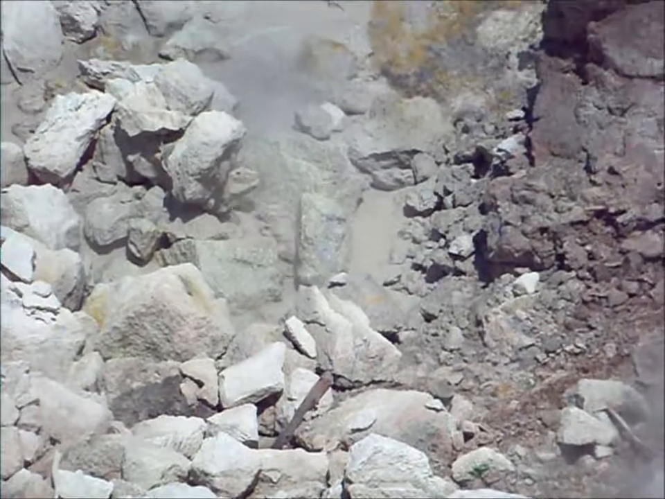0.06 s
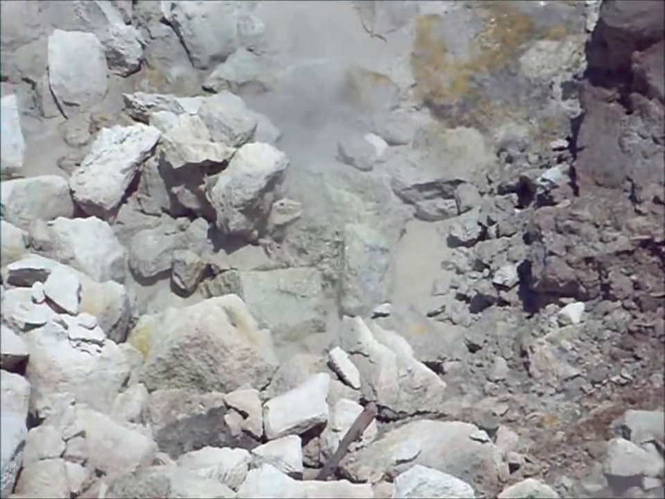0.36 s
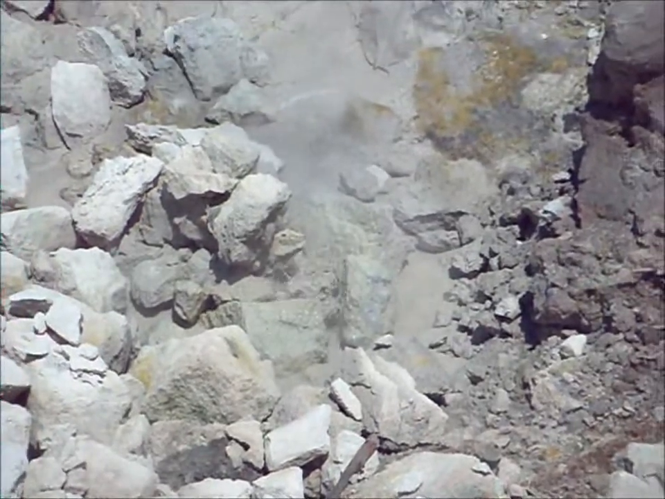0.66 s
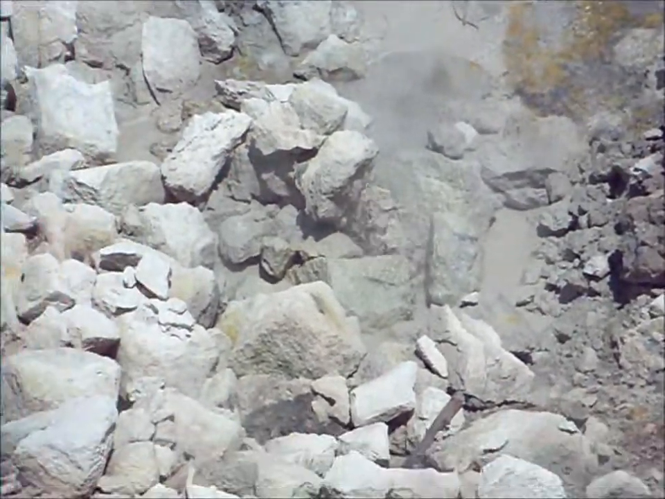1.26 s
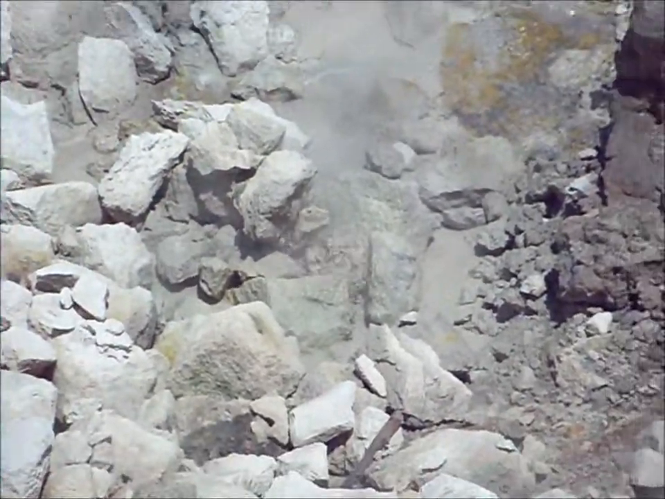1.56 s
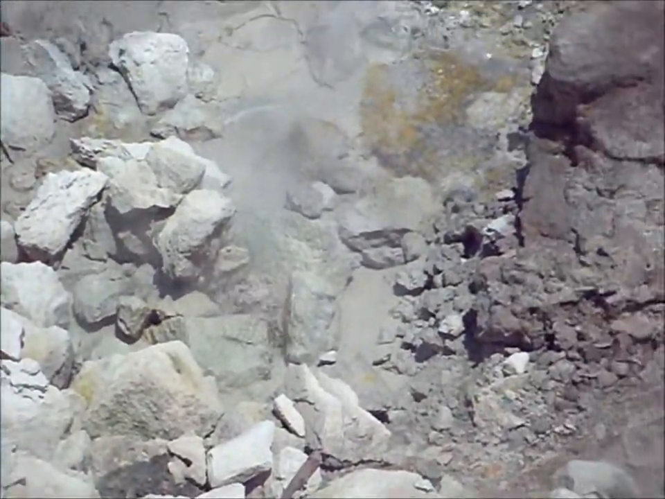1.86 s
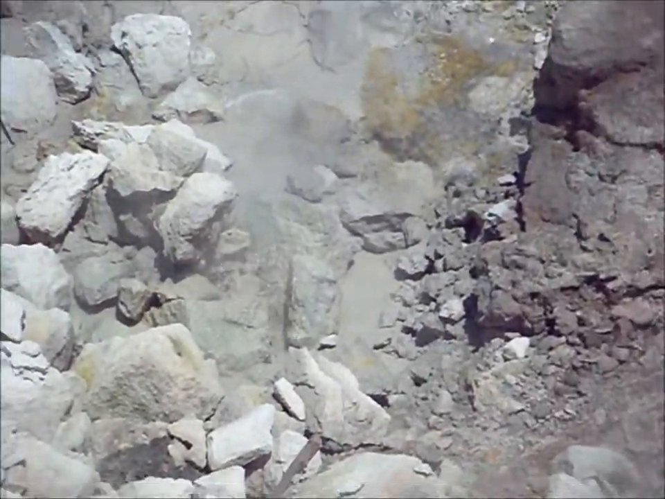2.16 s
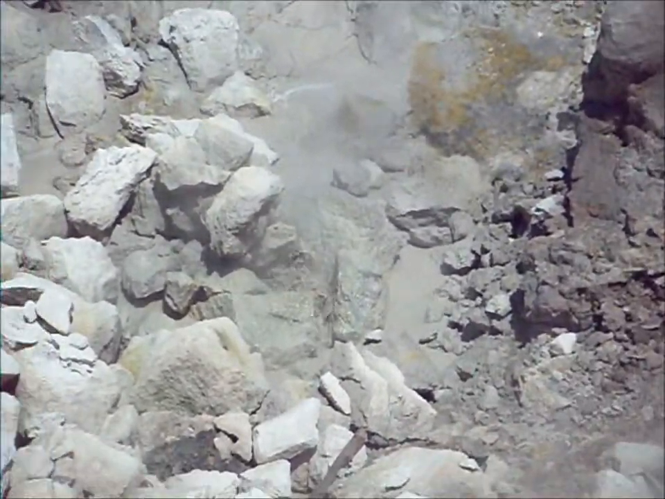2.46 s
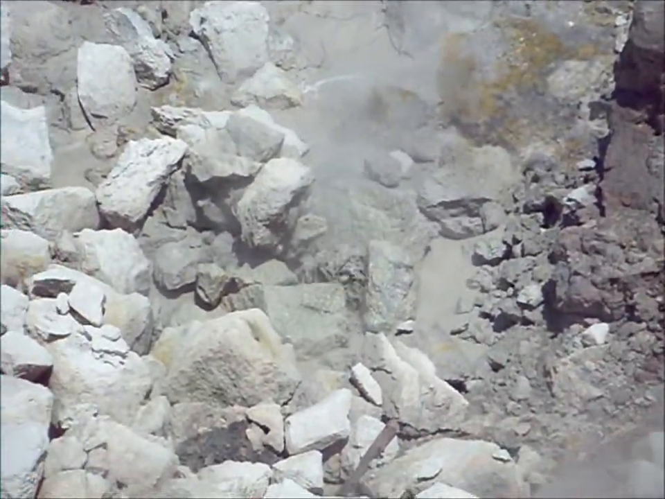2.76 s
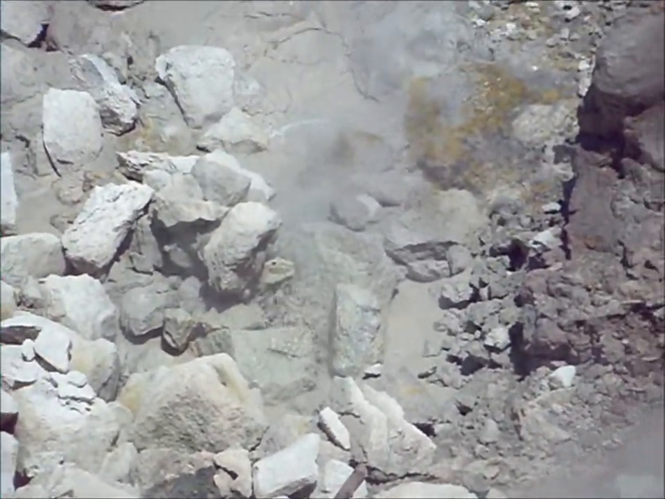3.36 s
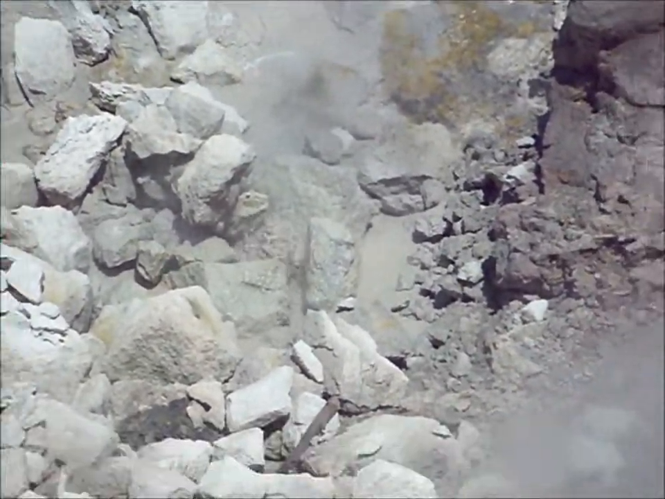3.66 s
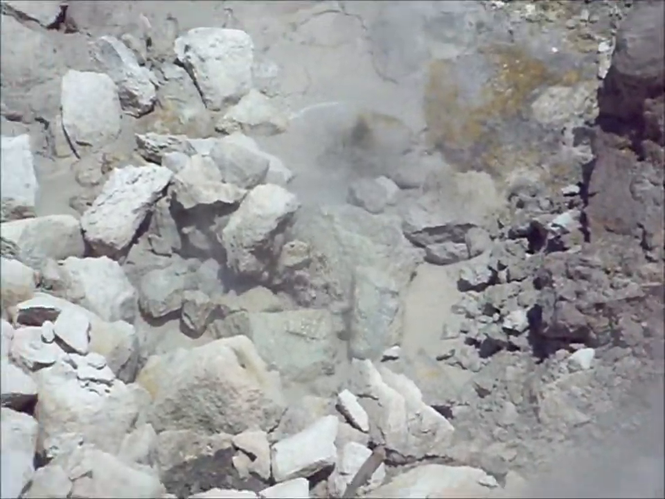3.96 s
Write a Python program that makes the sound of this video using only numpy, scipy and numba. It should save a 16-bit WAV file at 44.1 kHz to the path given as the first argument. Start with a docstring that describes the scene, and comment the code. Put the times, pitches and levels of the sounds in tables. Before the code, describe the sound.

A steam vent hisses outdoors above the low rush of boiling water. Early on, wind rumble and sharp handling knocks on the microphone make the hiss dip and swell back. The vent spits briefly, then another knock and soft thumps follow.

```python
"""From the start, steam hisses steadily from a vent among rocks, over the duller rush of boiling water.
From about one second in, the hand-held camera is bumped and knocked over a low rumble of wind and
fingers. Each knock overloads the microphone; the gain control turns the hiss down and lets it swell back.
The vent spits briefly, once among the knocks and twice in the calmer stretch that follows.
In the last half second comes one more knock, with a few more bumps."""
import sys
import numpy as np
from scipy import signal
from scipy.io import wavfile
from scipy.ndimage import minimum_filter1d
from numba import njit

SR = 44100
rng = np.random.default_rng(int(sys.argv[2]) if len(sys.argv) > 2 else 0)


def to_wav(sig):
    """Store sig (one row per channel, or 1-D mono) as 16-bit WAV at the path in sys.argv[1].

    Samples outside -1..1 are clipped; the rate is SR.
    """
    pcm = np.clip(np.atleast_2d(sig), -1, 1) * 32767
    pcm = np.round(pcm).astype(np.int16)
    wavfile.write(sys.argv[1], SR, pcm.T)  # frames by channels


N = 176400

# tone of the steam jet: (frequency [Hz], level [dB per Hz])
JET_SPECTRUM = [(700, -24), (950, -13), (1150, -2), (1300, -5), (1790, 1.5), (2080, 1), (2400, -3),
                (2850, -7.5), (3200, -5.5), (3600, -13.5), (4050, -13), (4500, -15.5), (5200, -21.5),
                (6000, -30)]
# loudness of the jet: (time [s], level [dB])
JET_LEVEL = [(0, -23.5), (.5, -22.5), (.9, -24.5), (1.2, -23), (1.65, -25), (1.9, -27), (2.35, -22),
             (2.6, -26), (3.1, -22.5), (3.5, -25), (3.6, -24), (3.8, -25.5), (4, -24.5)]
# faint whistles of the vent's cracks: (pitch [Hz], width [Hz], level against the jet [dB])
WHISTLES = [(1843, 80, -23), (3220, 51, -25.5), (3934, 20, -27)]
# tone of the boiling water: (frequency [Hz], level [dB per Hz])
BOIL_SPECTRUM = [(40, -3.5), (70, -3), (110, -0.5), (165, 1.5), (230, -0.5), (350, 0.5), (520, -3),
                 (750, -4), (1000, -3), (1400, -20)]
# loudness of the boiling: (time [s], level [dB])
BOIL_LEVEL = [(0, -30.5), (.8, -30), (1.5, -30), (2.3, -32.5), (3, -33), (3.5, -34), (3.7, -32), (4, -38.5)]
# tone of wind and fingers on the microphone: (frequency [Hz], level [dB per Hz])
RUMBLE_SPECTRUM = [(10, -4), (20, 1.5), (35, -9.5), (70, -10.5), (160, -31)]
# loudness of that rumble: (time [s], level [dB])
RUMBLE_LEVEL = [(0, -36.5), (.8, -42.5), (.9, -28), (1.0, -26), (1.15, -21), (1.36, -24), (1.6, -32.5),
                (2.2, -33), (3.45, -38), (3.65, -21), (3.82, -28.5), (4, -30)]
# soft bumps of the hand: (time of peak [s], level [dB], rise time [s], rebound frequency [Hz])
BUMPS = [(.897, -12, 0.0045, 35), (.927, -9, .007, 77), (0.933, -9, 0.0014, 90), (0.952, 2, 0.0013, 105),
         (1.1135, 1, 0.0015, 19), (1.130, -7.5, 0.00046, 69), (1.240, -6.5, .003, 37),
         (1.253, 2, 0.0018, 93), (3.539, 2, 0.0027, 91), (3.609, -1, 0.0017, 19.5),
         (3.801, -13.5, .008, 16), (3.85, 9.5, .002, 94)]
# hard knocks on the camera: (time [s], level [dB], pitch of the case [Hz], contact time [s])
KNOCKS = [(0.9362, 9, 987, 0.0009), (0.9403, 21.5, 994, .0016), (1.4193, 24.5, 823, 0.00044),
          (1.7212, 30, 807, .0002), (3.5322, 10, 920, 0.00091)]
# ringing tones of the camera case: (multiple of its pitch, level [dB], time to fade by 60 dB [s])
CASE_TONES = [(.33, -15, 0.016), (.8, -4, 0.018), (1.03, -3.5, 0.019), (1.3, -7.5, 0.0096),
              (1.62, -8, 0.018), (3.35, -3.5, .009), (4.9, -9, 0.0051)]
# spits from the vent: (time [s], level [dB])
SPITS = [(1.294, -16.5), (2.653, -13), (3.311, -25)]

SURGE_DB, SURGES_PER_S, FLICKERS_PER_S = 1.15, 8.6, 35
BUMP_DECAY_CYCLES, SCUFF_DB, SCUFF_HZ = 0.38, -25, 700
SPIT_BAND_HZ, SPIT_FADE_S = (2320, 3740), 0.02
THRESHOLD_DB, SQUEEZE, DEEPEST_DB = -4, 0.9, -24.5
LOOKAHEAD_S, ATTACK_S, HOLD_S = 0.007, 0.0045, 0.12
QUICK_SHARE, QUICK_RELEASE_S, SLOW_RELEASE_S = 0.25, 0.026, 0.14
AMPLIFIER_HISS_DB, OVERLOAD_DB, CUTOFF_HZ, TOP_HZ = -47.5, 0.5, 5350, 17500


def from_db(db):
    """Turn decibels into a number to multiply a sound by."""
    return 10 ** (np.asarray(db) / 20)


def rms_one(x):
    """Scale a signal so that its average strength (rms) is 1."""
    return x / np.sqrt(np.mean(x ** 2) + 1e-20)


def in_time(rows):
    """Join (time, value) points with straight lines, giving a value for every sample."""
    return np.interp(np.arange(N) / SR, *np.transpose(rows))


def drift(rate):
    """A smooth random wobble of about 1 either way; a higher rate makes it faster."""
    step = 40  # samples between points
    pole = np.exp(-2 * np.pi * step * rate / SR)
    noise = rng.standard_normal(N // step + 2002)
    slow = signal.lfilter([1], [1, -2 * pole, pole * pole], noise)[2000:]  # skip the filter's warm-up
    return np.interp(np.arange(N) / step, np.arange(len(slow)), rms_one(slow))


def filtered_noise(hz, kind, length):
    """Noise kept inside a "band" of frequencies, or "low", below one frequency."""
    return signal.sosfilt(signal.butter(2, hz, kind, fs=SR, output="sos"), rng.standard_normal(length))


def turbulence(spectrum, flicker_db, bands):
    """The noise of swirling air or water: bands that can each flicker on their own."""
    hz, db = np.transpose(spectrum)
    edges = np.geomspace(hz.min(), hz.max(), bands + 1)
    out = np.zeros(N)
    for low, high in zip(edges, edges[1:]):
        band = filtered_noise([low, high], "band", N + SR)[SR:]
        band_db = np.interp(np.log(low * high) / 2, np.log(hz), db)
        out += band * from_db(band_db + flicker_db * drift(FLICKERS_PER_S))
    return rms_one(out)


def add(track, time_s, sound):
    """Mix a sound into the track at the given time."""
    start = int(time_s * SR)
    track[start:start + len(sound)] += sound[:N - start]


def whistle(hz, width_hz):
    """Steam rushing through a crack makes it ring around one pitch."""
    b, a = signal.iirpeak(hz, hz / width_hz, fs=SR)
    ringing = signal.lfilter(b, a, rng.standard_normal(N))
    return rms_one(signal.lfilter(b, a, ringing))  # a second pass sharpens the pitch


def vent():
    """The steam jet, its whistles and the boiling water below swell and sink together."""
    surge_db = SURGE_DB * drift(SURGES_PER_S)
    jet = turbulence(JET_SPECTRUM, flicker_db=1.5, bands=22)
    jet += sum(from_db(db) * whistle(hz, width_hz) for hz, width_hz, db in WHISTLES)
    boil = turbulence(BOIL_SPECTRUM, flicker_db=0, bands=14)
    return from_db(in_time(JET_LEVEL) + surge_db) * jet + from_db(in_time(BOIL_LEVEL) + surge_db) * boil


def rumble():
    """Wind and fingers on the microphone make a lumpy, low noise."""
    return from_db(in_time(RUMBLE_LEVEL)) * turbulence(RUMBLE_SPECTRUM, flicker_db=3, bands=6)


def bumps():
    """Each bump of the hand is a smooth push and a rebound that dies fast, with a faint scuff of skin."""
    out = np.zeros(N)
    t = np.arange(-SR // 20, SR // 5) / SR  # the peak is at t = 0
    for peak_s, db, rise_s, hz in BUMPS:
        cycles = np.maximum(t, 0) * hz
        rise = np.exp(-(np.minimum(t, 0) / rise_s) ** 2)
        fade = 1 / np.cosh(cycles / BUMP_DECAY_CYCLES) ** 2
        rebound = np.cos(2 * np.pi * cycles)
        scuff = from_db(SCUFF_DB) * rms_one(filtered_noise(SCUFF_HZ, "low", len(t)))
        add(out, peak_s + t[0], from_db(db) * rise * fade * (rebound + scuff))
    return out


def knocks():
    """Each knock briefly rings the camera case; a longer contact starts softer and sounds duller."""
    out = np.zeros(N)
    t = np.arange(SR // 10) / SR
    for time_s, db, hz, contact_s in KNOCKS:
        rise = 1 - np.exp(-t / contact_s)
        for multiple, tone_db, fade_s in CASE_TONES:
            dulling = (1 + (contact_s * hz) ** 2) / (1 + (contact_s * hz * multiple) ** 2)
            fade = from_db(db + tone_db - 60 * t / fade_s)
            tone = np.sin(2 * np.pi * (hz * multiple * t + rng.random()))
            add(out, time_s, dulling * rise * fade * tone)
    return out


@njit
def follow(wanted, release_s):
    """Move towards the wanted gain: fast going down, slower coming back up."""
    attack, release = 1 / (ATTACK_S * SR), 1 / (release_s * SR)
    out, gain = np.empty_like(wanted), 1.0
    for i in range(len(wanted)):
        gain += (wanted[i] - gain) * (attack if wanted[i] < gain else release)
        out[i] = gain
    return out


def gain_control(x):
    """Turn the volume down just before a loud peak, wait, then bring some back fast, the rest slowly."""
    coming = np.interp(np.arange(N) + LOOKAHEAD_S * SR, np.arange(N), np.abs(x))
    excess = np.maximum(coming / from_db(THRESHOLD_DB), 1)
    wanted = np.maximum(excess ** -SQUEEZE, from_db(DEEPEST_DB))
    half_hold = int(HOLD_S * SR / 2)
    held = minimum_filter1d(wanted, 2 * half_hold + 1, origin=half_hold, mode="nearest")
    quick = follow(held, QUICK_RELEASE_S)
    slow = follow(held, SLOW_RELEASE_S)
    return x * (slow + QUICK_SHARE * (quick - slow))


def spits():
    """The vent throws out short, bright bursts of spray."""
    out = np.zeros(N)
    t = np.arange(SR // 10) / SR
    for time_s, db in SPITS:
        spray = rms_one(filtered_noise(SPIT_BAND_HZ, "band", len(t)))
        add(out, time_s, from_db(db - 60 * t / SPIT_FADE_S) * spray)
    return out


def scene():
    """The vent and the noises of holding the camera all reach one microphone."""
    return (vent() + rumble() + bumps() + knocks() + spits())[None]


def record(dry):
    """The camera controls the volume, adds faint hiss, flattens overloaded peaks and cuts the treble."""
    hiss = from_db(AMPLIFIER_HISS_DB) * rng.standard_normal(N)
    ceiling = from_db(OVERLOAD_DB)
    overloaded = np.clip(gain_control(dry[0]) + hiss, -ceiling, ceiling)
    treble_cut = signal.firwin(301, CUTOFF_HZ, window=("kaiser", 9), fs=SR)
    dulled = np.convolve(overloaded, treble_cut, "same")
    clipped = np.clip(dulled, -1, 1)
    top_cut = signal.cheby2(12, 70, TOP_HZ, fs=SR, output="sos")
    return signal.sosfilt(top_cut, clipped)[None]


dry = scene()
out = record(dry)
to_wav(out)
```